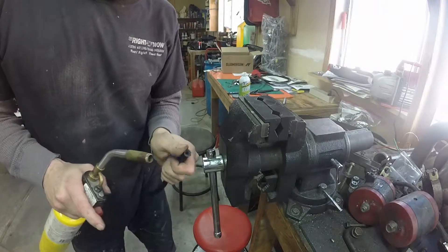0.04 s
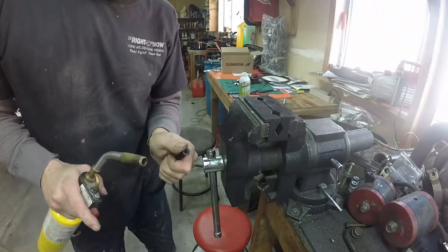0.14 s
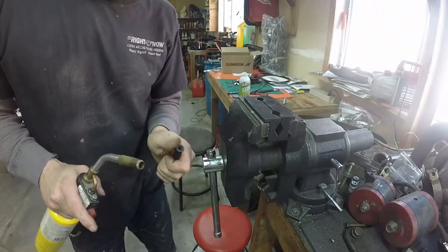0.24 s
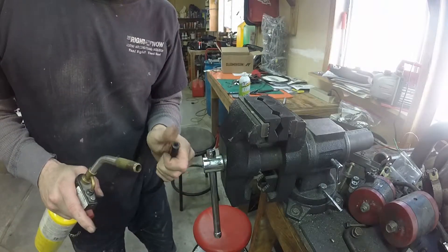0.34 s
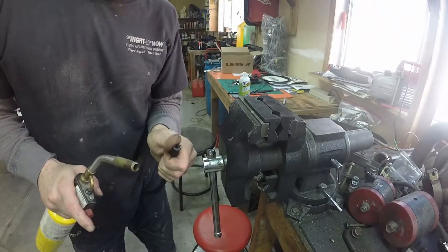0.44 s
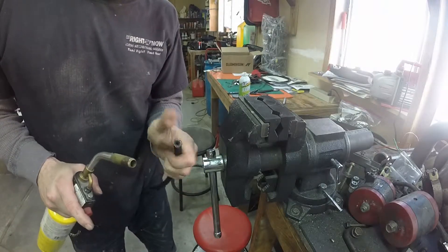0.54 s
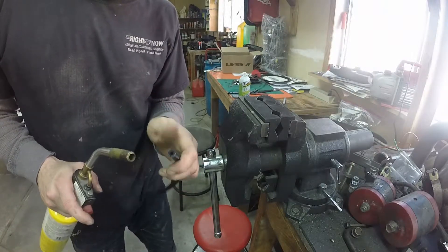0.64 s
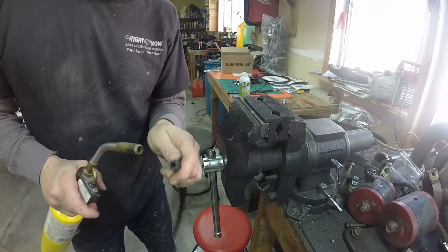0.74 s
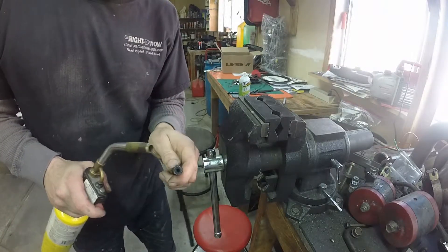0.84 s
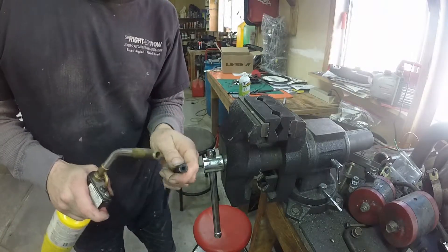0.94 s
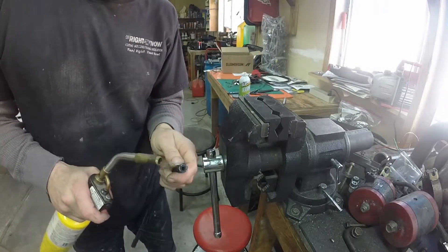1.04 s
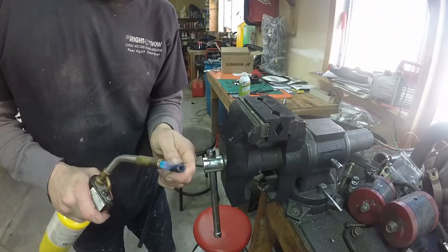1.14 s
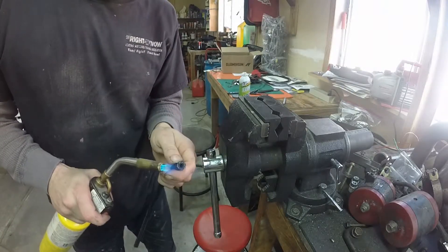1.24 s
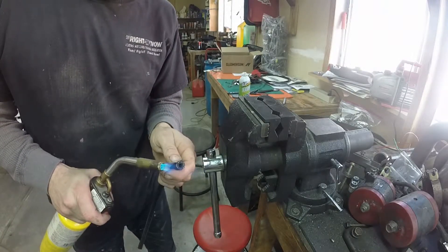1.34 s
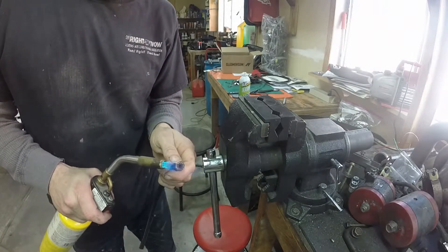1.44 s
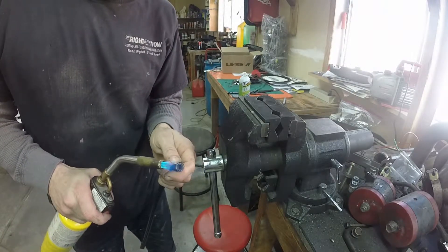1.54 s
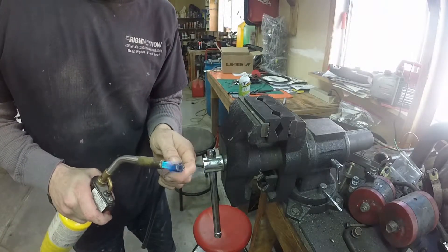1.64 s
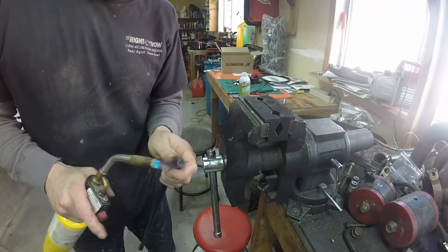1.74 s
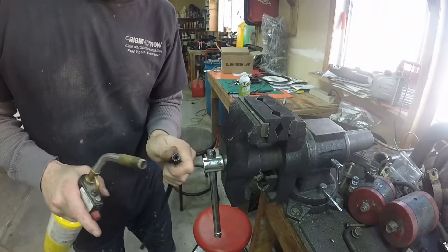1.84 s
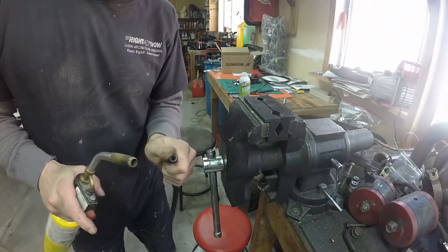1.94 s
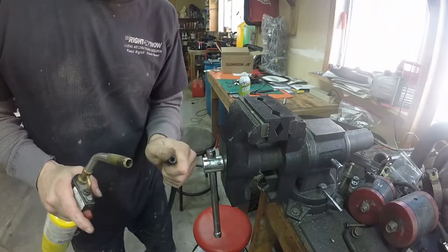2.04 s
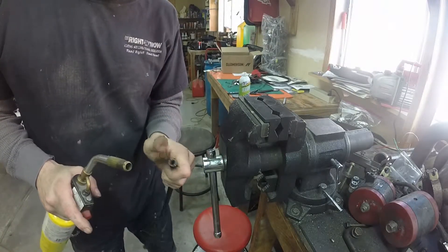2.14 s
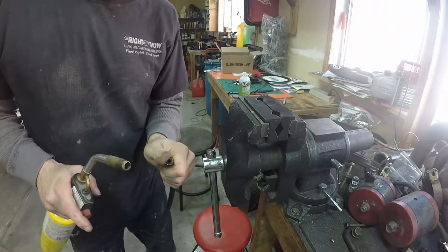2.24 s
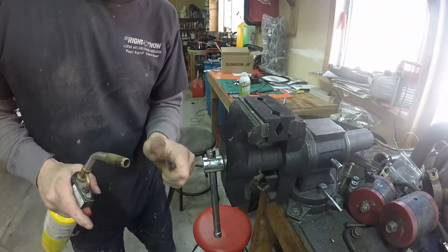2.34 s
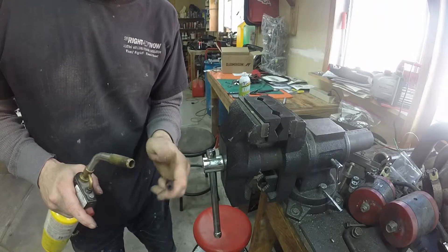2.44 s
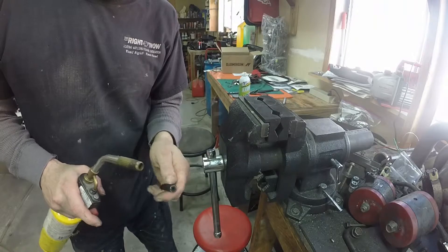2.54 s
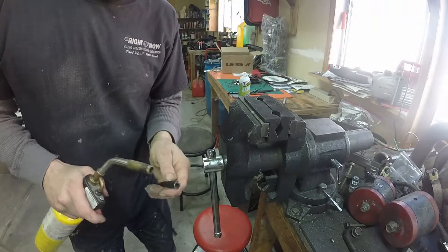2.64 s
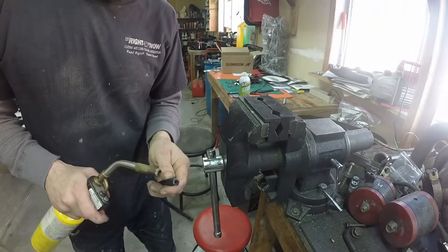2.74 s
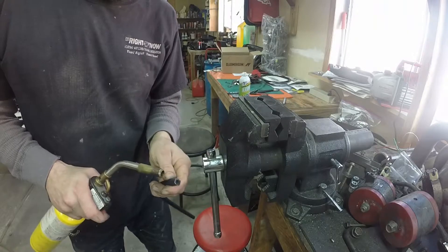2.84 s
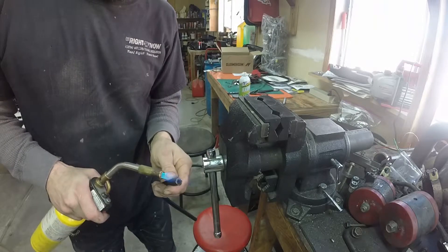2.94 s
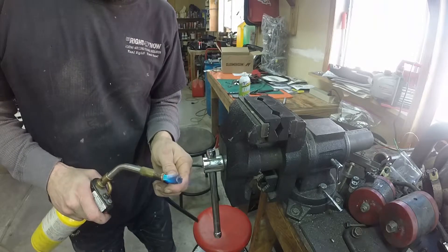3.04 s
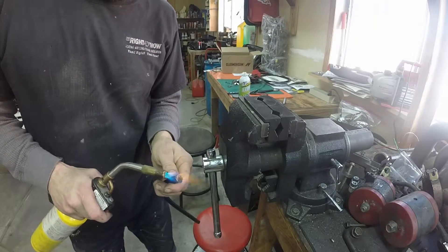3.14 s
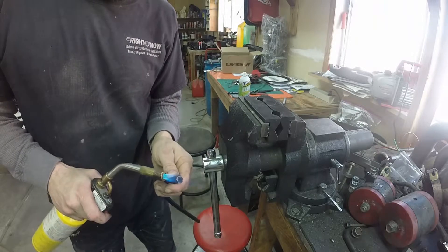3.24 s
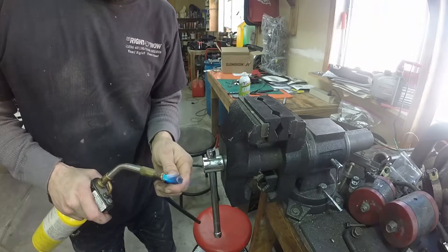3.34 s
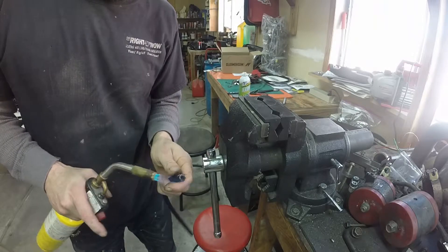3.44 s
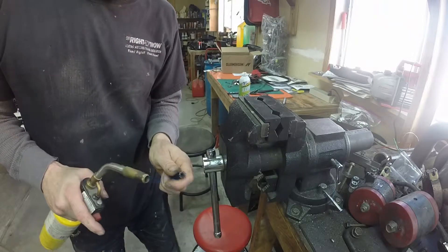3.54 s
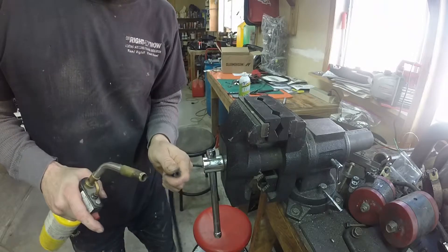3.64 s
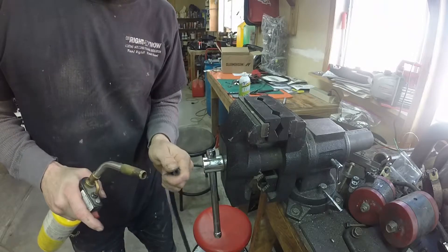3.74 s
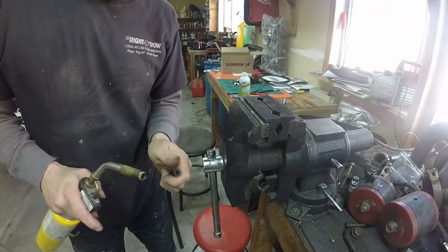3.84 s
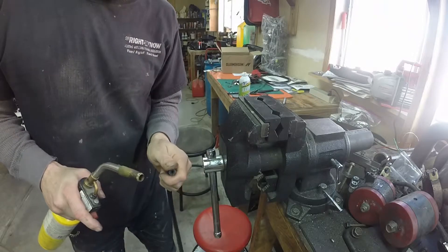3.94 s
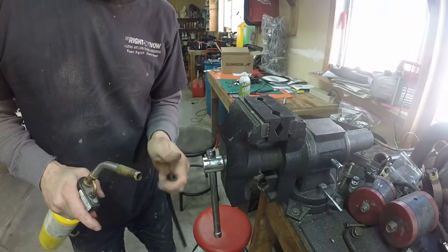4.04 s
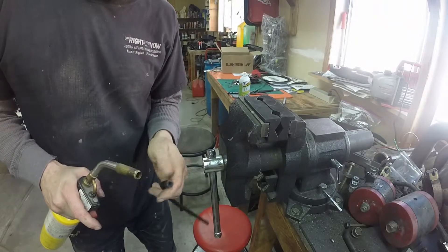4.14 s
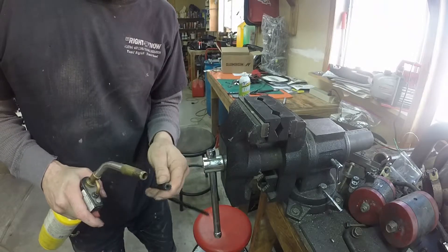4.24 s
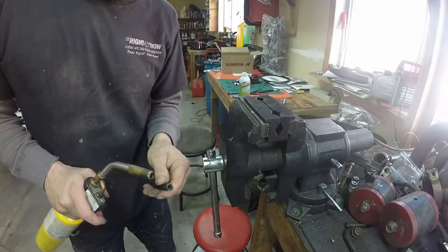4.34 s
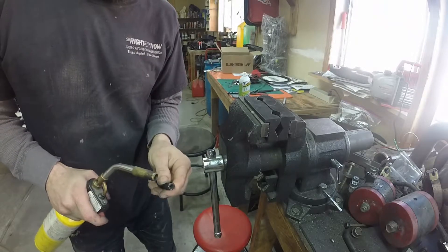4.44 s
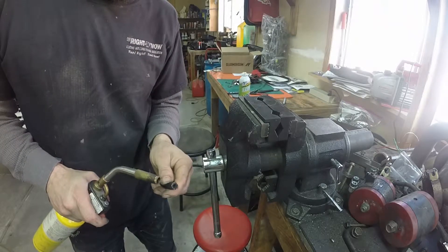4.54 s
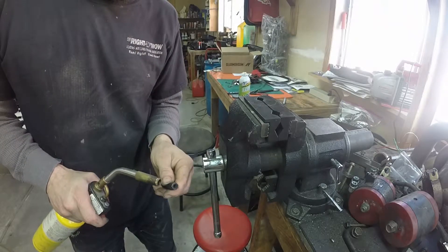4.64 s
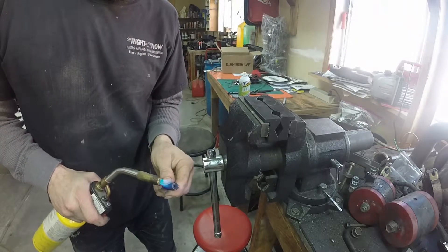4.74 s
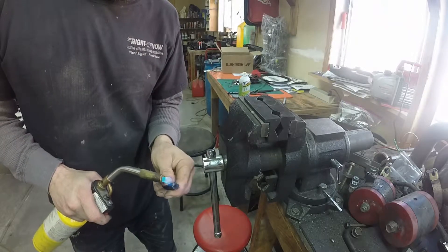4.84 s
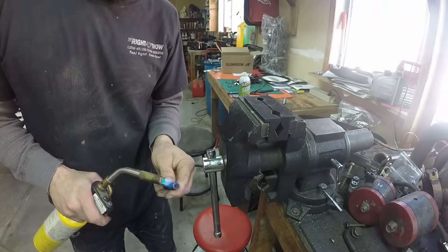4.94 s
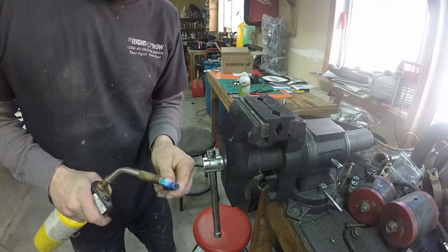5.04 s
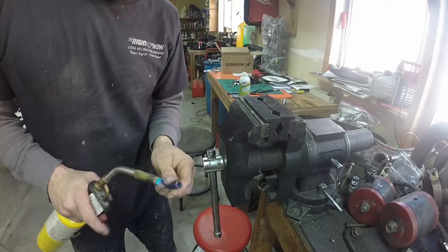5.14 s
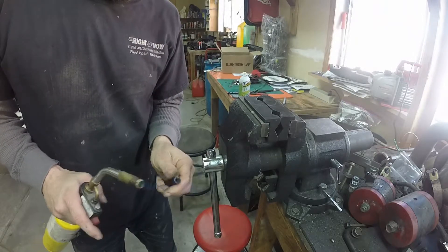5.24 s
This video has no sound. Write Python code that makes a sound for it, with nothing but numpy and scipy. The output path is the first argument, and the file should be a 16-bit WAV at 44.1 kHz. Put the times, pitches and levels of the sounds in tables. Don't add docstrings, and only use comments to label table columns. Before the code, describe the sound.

A handheld gas torch fires three short bursts in a small garage, each hissing, snapping alight with a distorted thump, roaring, then hooting out.

```python
import sys
import numpy as np
from scipy import signal
from scipy.fft import rfft, irfft, next_fast_len
from scipy.io import wavfile
from scipy.ndimage import uniform_filter1d

SR = 44100
rng = np.random.default_rng(int(sys.argv[2]) if len(sys.argv) > 2 else 0)


def rack_gain(trim_db):
    fader = np.asarray(trim_db, float)
    return 10 ** (fader / 20)


def transcribe(u):
    v = np.clip(np.atleast_2d(u).T, -1, 1)
    q = np.round(v * 32767).astype(np.int16)
    wavfile.write(sys.argv[1], SR, q)


N = 233486
TIME = np.arange(N) / SR

# opens in s, cold gas level in dB, shuts in s, left-over gas re cold gas in dB.
VALVE = [
    (1.022, -39.5, 1.82, -5),
    (2.852, -39, 3.51, -6.5),
    (4.569, -39.5, 5.22, -6),
]
# igniter snaps in s, snap level in dB, thump pitch in Hz, bench echo lag in s, echo level in dB.
LIGHT = [
    (1.1951, -10, 310, .0066, -15),
    (2.9788, -12.5, 310, .0072, -11),
    (4.7454, -15.5, 290, .0068, -11),
]
# frequency in Hz, density in dB per Hz.
JET = [(2650, -26.5), (4500, -5), (5370, -4.5), (5710, -4), (6670, 2), (7510, -2), (8370, -17.5),
       (9290, -15), (10400, -7.5), (13100, -28), (15500, -32)]
# frequency in Hz, density in dB per Hz.
ROAR = [(24, -54.5), (40, -32.5), (85, -19), (205, -2), (246, -5.5), (289, -2), (540, -8.5), (728, 1),
        (1100, -7.5), (1400, -23), (1820, -39), (3080, -120)]
# frequency in Hz, density in dB per Hz.
RUSH = [(650, -29.5), (1100, 1), (1240, -5.5), (1390, -14.5), (1790, -5.5), (2050, -10.5), (2480, -9.5),
        (2690, -3.5), (2970, -8.5), (3420, -6.5), (3610, -7.5), (4270, -26.5), (4510, -22.5), (4800, -33.5),
        (6240, -53), (10600, -120)]


def level(x, db):
    return x * rack_gain(db) / np.sqrt(np.mean(x ** 2))


def noise():
    return rng.standard_normal(N)


def colour(x, points):
    hz, db = np.transpose(points)
    size = next_fast_len(N)
    f = np.maximum(np.fft.rfftfreq(size, 1 / SR), 1)
    gain = rack_gain(np.interp(np.log(f), np.log(hz), db))
    return level(irfft(rfft(x, size) * gain, size)[:N], 0)


def ring(x, modes):
    return sum(rack_gain(db) * signal.lfilter(*signal.iirpeak(hz, hz / width, SR), x) for hz, width, db in modes)


def walk(rate_hz):
    k = int(SR / rate_hz)
    steps = np.repeat(rng.standard_normal(N // k + 1), k)
    return level(uniform_filter1d(uniform_filter1d(steps, k), k)[:N], 0)


def ramp(s, length_s):
    return np.clip((TIME - s) / length_s, 0, 1)


def tone(hz):
    return np.sin(2 * np.pi * np.cumsum(hz) / SR)


def room(x):
    t60_s, treble_t60_s, gap_s = 0.17, 0.4, 0.0033
    t = np.arange(SR) / SR
    dark, bright = rng.standard_normal((2, SR))
    low = signal.butter(1, 3000, fs=SR)
    tail = signal.lfilter(*low, dark) * np.exp(-np.log(1000) * t / t60_s)
    tail += 0.5 * bright * np.exp(-np.log(1000) * t / treble_t60_s)
    tail *= np.clip(t / gap_s - .5, 0, 1)
    return rack_gain(-13.5) * signal.fftconvolve(x, tail / np.sqrt(np.sum(tail ** 2)))[:N]


def far_rumble():
    motor_hz, slows_hz_per_s, fade_s = 61, 9, 1
    swell_db = 10.5 * np.exp(-((TIME - 2.76) / 0.36) ** 2)
    rumble = colour(noise(), [(10, -22.5), (28, 2.5), (48, 0.0), (57, 6), (68, -9), (120, -35), (200, -61.5)])
    turning_hz = np.maximum(motor_hz - slows_hz_per_s * TIME, 20) * (1 + 0.014 * walk(9))
    motor = np.sqrt(2) * rack_gain(-44.5) * tone(turning_hz)
    motor *= np.exp(-(TIME / fade_s) ** 2) * ramp(0, 0.048)
    return (rumble * rack_gain(-55 + swell_db) + motor) * rack_gain(1.6 * walk(6.5))


def earlier_burst():
    start_db, t60_s = -49, 0.36
    tail = colour(noise(), RUSH) + 0.36 * colour(noise(), JET)
    tail += level(ring(noise(), [(990, 120, 0)]), 0)
    return tail * rack_gain(start_db - 60 * TIME / t60_s)


def shop():
    # frequency in Hz, density in dB per Hz.
    air = [(35, -31.5), (60, -3.5), (142, -6), (207, -12.5), (238, -9.5), (338, -14), (593, -16.5),
           (1250, -22), (3420, -26), (13900, -45.5), (16000, -56)]
    # frequency in Hz, level in dB.
    mains = [(242, -65)]
    floor = colour(noise(), air) * rack_gain(-49.5 + 0.22 * walk(3.07))
    hum = sum(np.sqrt(2) * rack_gain(db + 2.5 * walk(3.4)) * np.sin(2 * np.pi * hz * TIME) for hz, db in mains)
    return floor + far_rumble() + hum + earlier_burst()


def ticks():
    # start in s, peak level in dB, pitch in Hz, t60 in s.
    knocks = [(.108, -38, 340, .05), (.137, -42, 290, .04), (0.157, -37, 300, 0.055),
              (0.222, -40, 300, 0.05), (.314, -49, 3700, .015), (.317, -49, 10300, .012),
              (.594, -44, 3100, 0.019), (.8222, -38.5, 766, .04), (.8222, -43, 1600, .012),
              (.8222, -40, 3100, .01), (2.656, -39, 846, 0.055), (2.656, -41, 2400, 0.008),
              (3.884, -55, 11000, 0.012), (1.756, -36, 13800, .012), (3.452, -38, 13800, .012)]
    out, t = np.zeros(N), TIME[:SR // 8]
    for s, db, hz, t60_s in knocks:
        push = rng.standard_normal(len(t)) * np.exp(-np.log(1000) * t / t60_s)
        push[0] += 2.4 * np.sqrt(SR / hz)
        mode = [(hz, .6 * hz, 0)]
        knock = ring(ring(push, mode), mode)
        out[int(s * SR):][:len(t)] += rack_gain(db) * knock / np.abs(knock).max()
    return out


def gas():
    # frequency in Hz, width in Hz, level in dB.
    cold_tube = [(958, 70, -0.5), (2224, 110, -3.5), (2640, 60, -8.5), (3440, 120, 1.5), (4700, 99, -6.5),
                 (5760, 170, -4), (6310, 80, -5.5), (6980, 210, -27), (7420, 108.5, -19),
                 (9950, 150, -15.5), (10500, 750, -16.5), (11500, 120, -16.5), (12730, 100, -26.5)]
    # frequency in Hz, level in dB.
    whistle = [(3420, -2.5), (2196, -8), (5560, -10), (4800, -15)]
    # frequency in Hz, density in dB per Hz.
    cold_jet = [(880, -51), (1500, -24), (3410, -2.5), (4160, -19), (5660, -0.5), (8320, -29),
                (13000, -16.5), (15100, -40), (16000, -61)]
    open_s, shut_s, bleed_s = 0.02, 0.053, 0.047
    hiss = level(ring(noise(), cold_tube), -1) + rack_gain(-4.5) * colour(noise(), cold_jet)
    for hz, db in whistle:
        swing = rack_gain(db + 2.0 * walk(60))
        hiss += swing * tone(hz * (1 + .005 * walk(12) + 0.00382 * walk(200)))
    bleed = colour(colour(noise(), JET), [(6000, 12), (10000, -22)])
    flow, rest = np.zeros((2, N))
    for on, db, off, more_db in VALVE:
        flow += rack_gain(db) * ramp(on, open_s) * np.clip((off - TIME) / shut_s, 0, 1)
        rest += rack_gain(db + more_db) * (TIME > off - .03) * np.exp(-np.abs(TIME - off) / bleed_s)
    return (hiss * flow + bleed * rest) * rack_gain(1.0 * walk(25.38))


def hoot():
    # start in s, length in s, lowest pitch in Hz, level in dB, afterglow in dB.
    hoots = [
        (1.779, .063, 976, -24, -37),
        (3.47, .052, 880, -24, -52),
        (5.178, .06, 975, -24, -39),
    ]
    top_hz, fall_hz_per_s, cooled_hz = 1115, 4000, 990
    rise_s, die_db_per_s, afterglow_t60_s = 0.011, 1300, 0.24
    hz, size = np.full(N, 1. * top_hz), 0
    for s, length_s, low_hz, db, after_db in hoots:
        t = np.maximum(TIME - s, 0)
        late = np.maximum(TIME - s - length_s, 0)
        falling = np.maximum(top_hz - fall_hz_per_s * t, low_hz)
        settling = falling + (cooled_hz - falling) * ramp(s + length_s, 0.0316)
        hz = np.where(TIME > s, settling, hz)
        song = rack_gain(db - die_db_per_s * late)
        afterglow = rack_gain(after_db - 60 * late / afterglow_t60_s)
        size = size + ramp(s, rise_s) * (song + afterglow)
    return np.sqrt(2) * tone(hz * (1 + 0.0072 * walk(120))) * size * rack_gain(1.6 * walk(110))


def thump(t, hz):
    slow_s = .0045
    turns = hz * (.3 * t + .7 * slow_s * (1 - np.exp(-t / slow_s)))
    size = .8 * np.exp(-((t - .0024) / .0022) ** 2) + .3 * np.exp(-t / .009)
    return -np.sin(2 * np.pi * turns) * size


def ignition():
    # frequency in Hz, width in Hz, level in dB.
    snap = [(2114, 1900, -5.5), (3500, 1300, -1), (5900, 1800, -11.5), (10900, 1380, -3.5),
            (13544, 1800, -22.5)]
    lag_s, thump_db = .0017, 4.2
    crackle = np.zeros(N)
    for hz, width, db in snap:
        crackle += ring(ring(noise(), [(hz, width, 0)]), [(hz, width, db)])
    crackle = level(crackle, 0)
    flash = colour(noise(), ROAR) + 0.64 * colour(noise(), RUSH)
    out = np.zeros(N)
    for s, snap_db, hz, echo_lag_s, echo_db in LIGHT:
        t = np.maximum(TIME - s, 0)
        out += rack_gain(snap_db) * crackle * (t / 0.0013) ** 2 * np.exp(2 - 2 * t / 0.0017)
        out += rack_gain(snap_db - 10) * crackle * (1 - np.exp(-t / 0.0049)) * np.exp(-t / 0.016)
        out += rack_gain(-21) * flash * np.clip(t / 0.0032, 0, 1) * np.clip((.02 - t) / .005, 0, 1)
        boom = np.maximum(t - lag_s - .002, 0)
        out += rack_gain(-11) * np.sin(2 * np.pi * 88 * boom) * np.exp(-boom / 0.0084)
        out += rack_gain(thump_db) * thump(np.maximum(t - lag_s, 0), hz)
        out += rack_gain(thump_db + echo_db) * thump(np.maximum(t - lag_s - echo_lag_s, 0), hz)
    return out


def burning():
    # trigger let go in s, flame level in dB, starved drop in dB, flame out in s.
    flames = [
        (1.762, -18.5, 5.5, 1.824),
        (3.453, -18.5, 7.5, 3.514),
        (5.163, -18.5, 6, 5.226),
    ]
    catch_lag_s, catch_s, settle_s, starve_s = 0.02, 0.047, 0.016, 0.013
    sag_db_per_s, die_db_per_s = 59, 560
    size, fresh, starved = np.zeros((3, N))
    for (lit, *_), (let_go, db, drop_db, out) in zip(LIGHT, flames):
        short = ramp(let_go, starve_s)
        loss_db = drop_db * short + sag_db_per_s * np.maximum(TIME - let_go, 0)
        loss_db += die_db_per_s * np.maximum(TIME - out, 0)
        size += rack_gain(db - loss_db) * ramp(lit + catch_lag_s - catch_s / 2, catch_s)
        settling = np.exp(-np.maximum(TIME - lit - catch_lag_s, 0) / settle_s)
        fresh = np.where(TIME > lit, settling, fresh)
        starved = np.where(TIME > lit, short, starved)
    return size, fresh, starved


def flame():
    # frequency in Hz, density in dB per Hz.
    warm_rush = [(650, -24.5), (1100, -2), (1320, -11), (1490, -13), (1900, -10), (2140, -14.5),
                 (2360, -10.5), (2580, -16.5), (2840, -5.5), (2990, -6.5), (3510, -10), (3990, -20),
                 (4460, -31), (4800, -41), (6240, -61), (10600, -120)]
    size, fresh, starved = burning()
    flare = walk(160)
    roar_db = 3.5 + 1.1 * fresh - 5 * starved
    roar = colour(noise() * rack_gain(1.3 * flare), ROAR) * rack_gain(roar_db + 0.6 * walk(30))
    burn = noise() * rack_gain(0.88 * flare)
    first_burst = TIME < VALVE[1][0]
    rush = np.where(first_burst, colour(burn, RUSH), colour(burn, warm_rush))
    rush = rush * rack_gain(-0.1 + 0.11 * walk(18))
    jet_db = -18 + 7 * fresh + 1 * starved
    jet = colour(noise() * rack_gain(.7 * flare), JET) * rack_gain(jet_db)
    return (roar + rush + jet) * size


def scene():
    near = gas() + flame() + ignition() + ticks()
    song = hoot()
    return (near + song + room(near + 0.23 * song) + shop())[None]


def roll_off(x):
    return signal.sosfilt(signal.butter(12, 16610, fs=SR, output="sos"), x)


def record(dry):
    top = signal.ellip(8, .3, 60, 15150, fs=SR, output="sos")
    mix = np.clip(signal.sosfilt(top, dry), -1, 1)
    return roll_off(mix)


dry = scene()
out = record(dry)
transcribe(out)
```